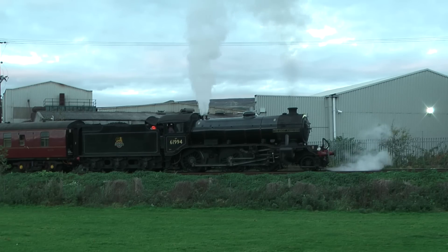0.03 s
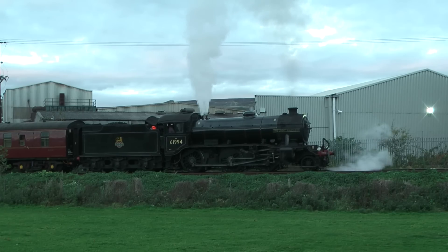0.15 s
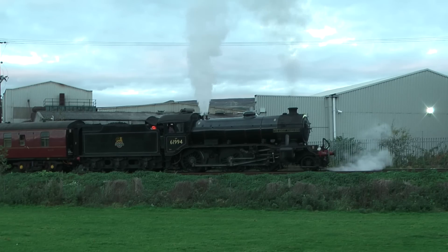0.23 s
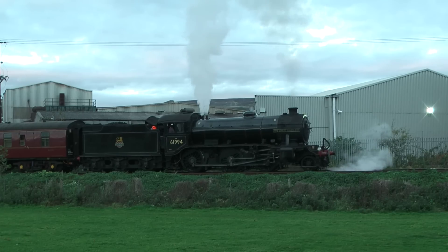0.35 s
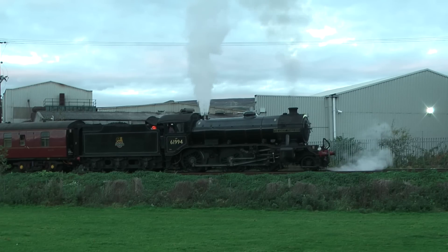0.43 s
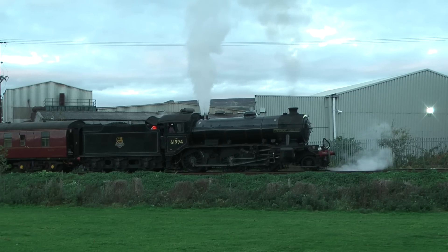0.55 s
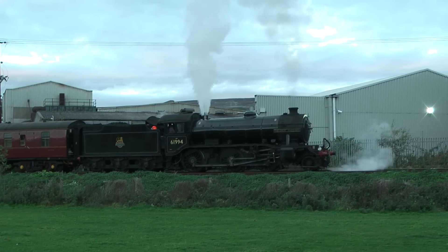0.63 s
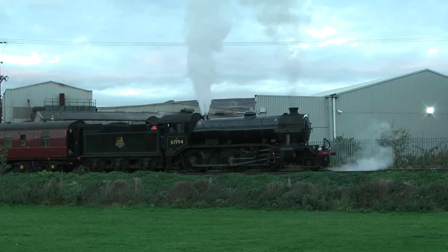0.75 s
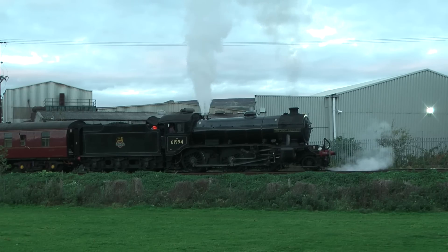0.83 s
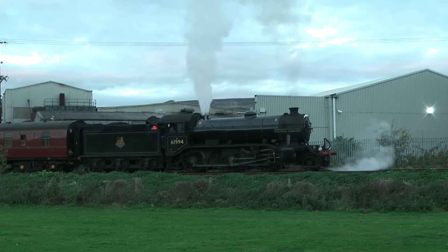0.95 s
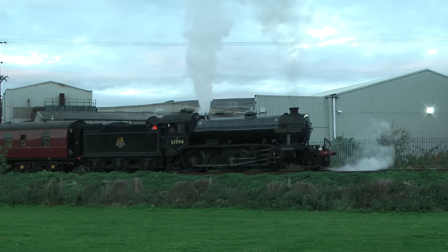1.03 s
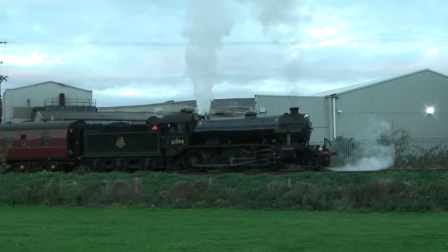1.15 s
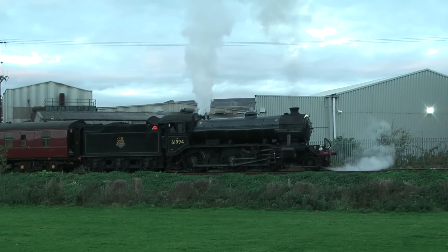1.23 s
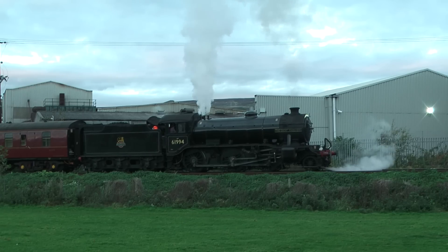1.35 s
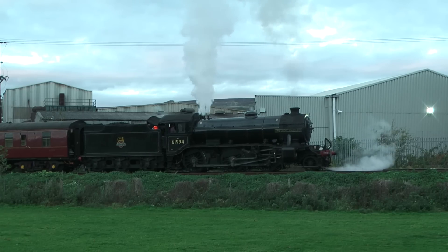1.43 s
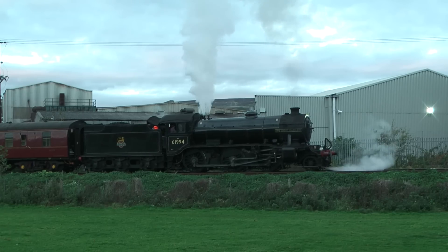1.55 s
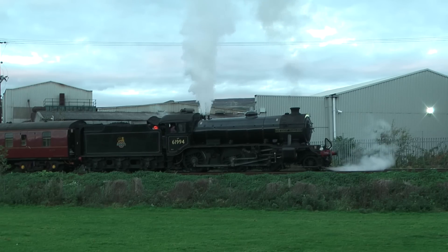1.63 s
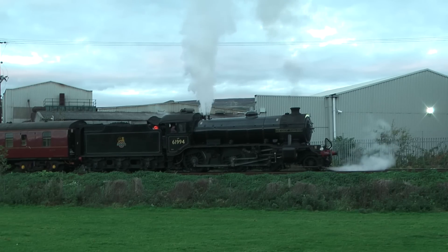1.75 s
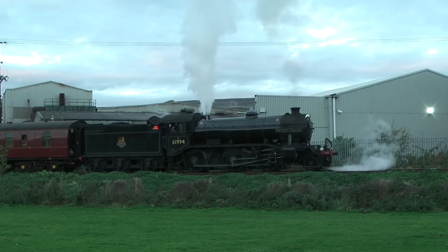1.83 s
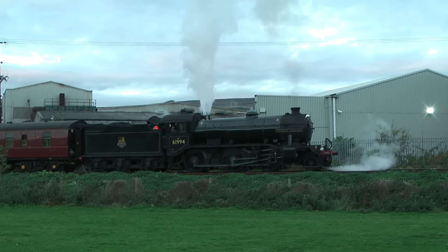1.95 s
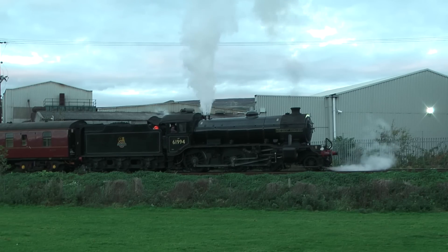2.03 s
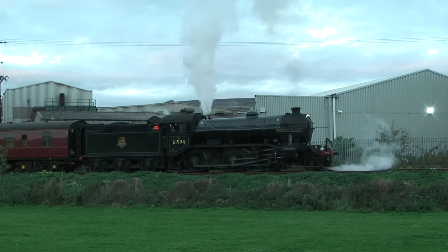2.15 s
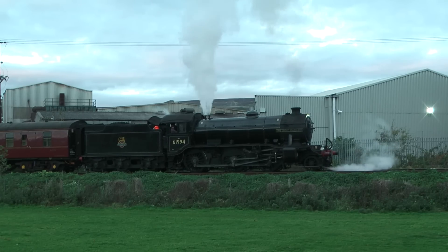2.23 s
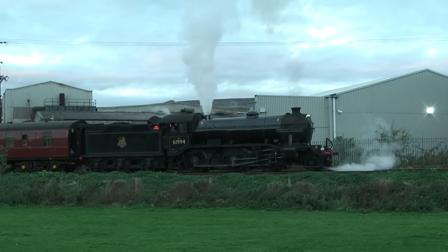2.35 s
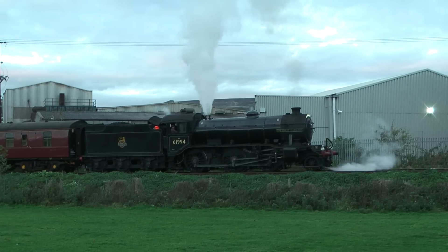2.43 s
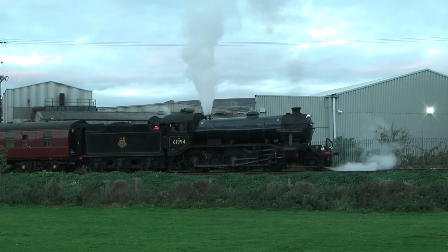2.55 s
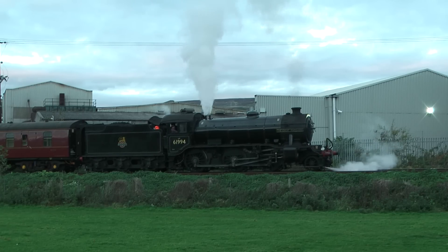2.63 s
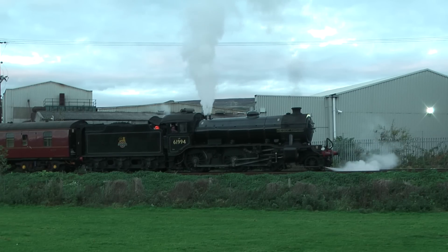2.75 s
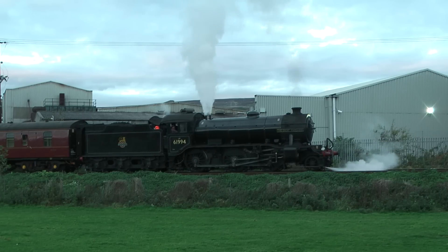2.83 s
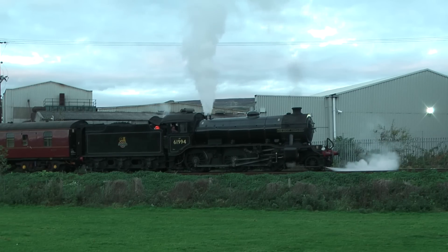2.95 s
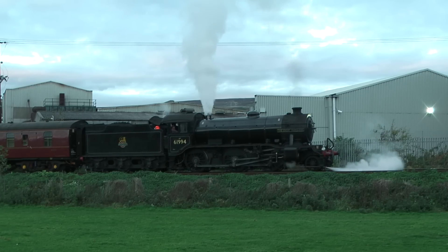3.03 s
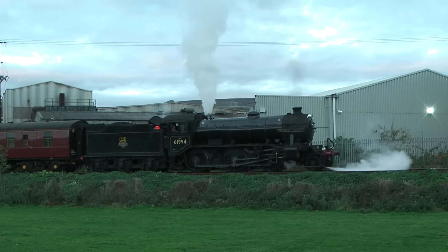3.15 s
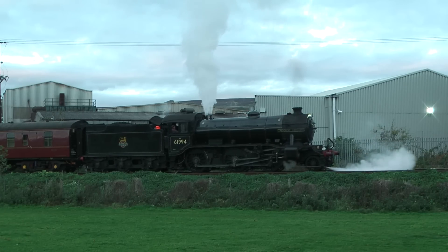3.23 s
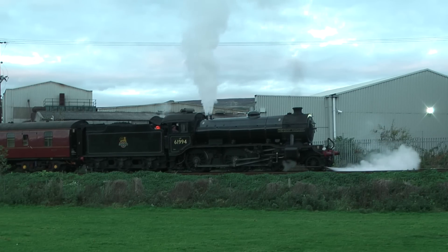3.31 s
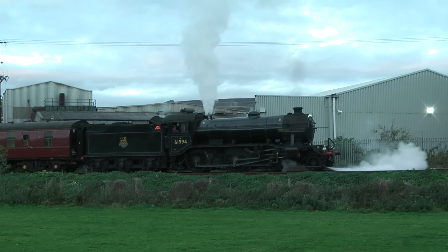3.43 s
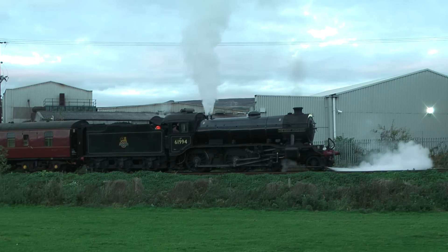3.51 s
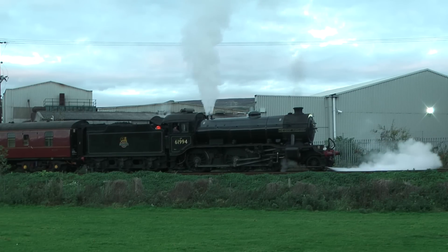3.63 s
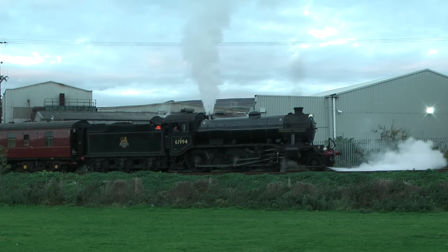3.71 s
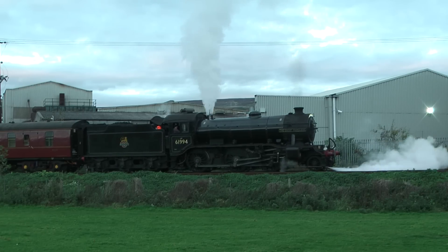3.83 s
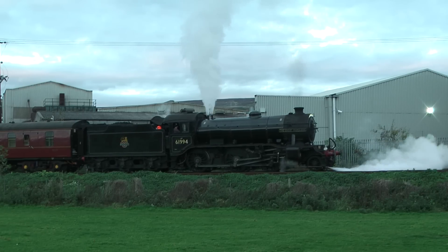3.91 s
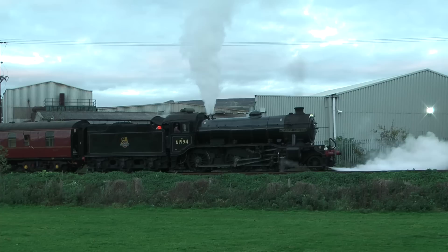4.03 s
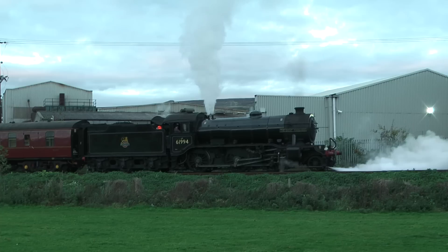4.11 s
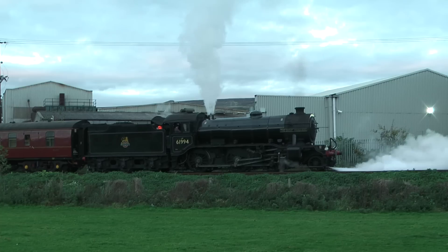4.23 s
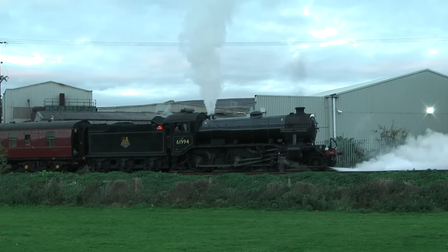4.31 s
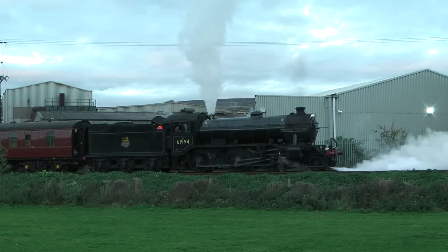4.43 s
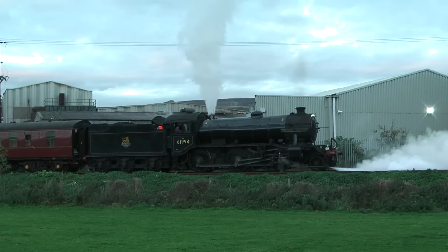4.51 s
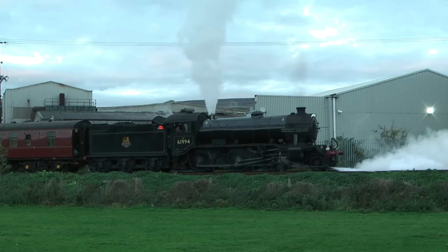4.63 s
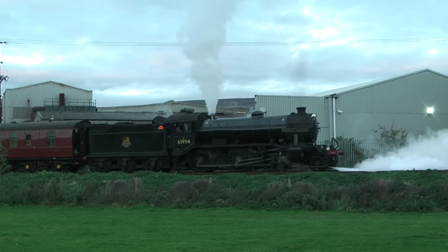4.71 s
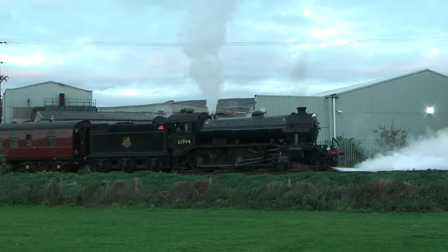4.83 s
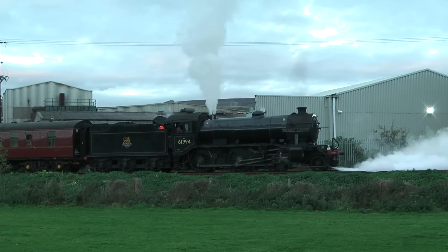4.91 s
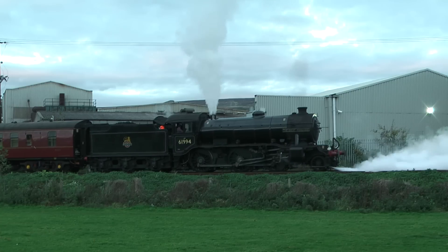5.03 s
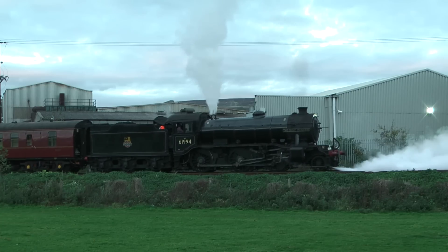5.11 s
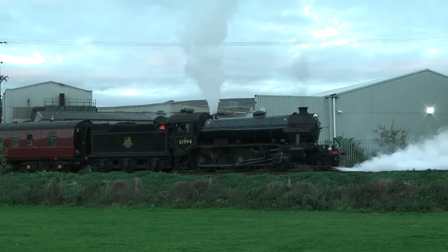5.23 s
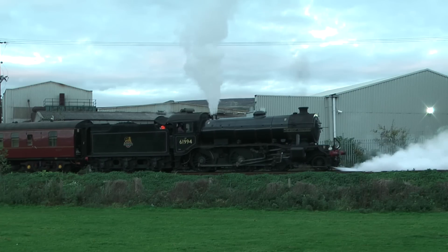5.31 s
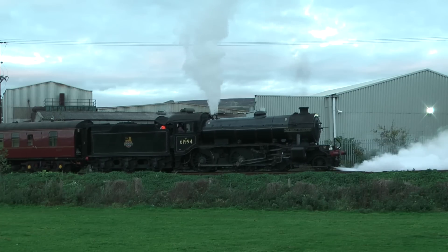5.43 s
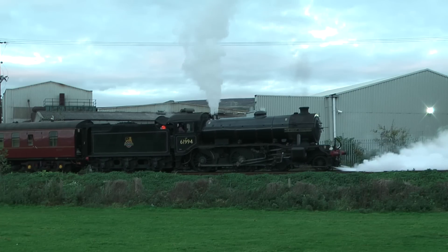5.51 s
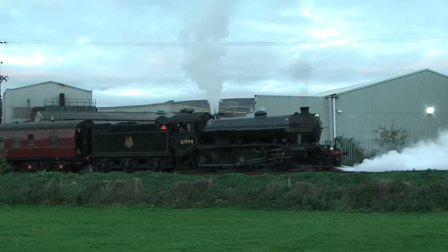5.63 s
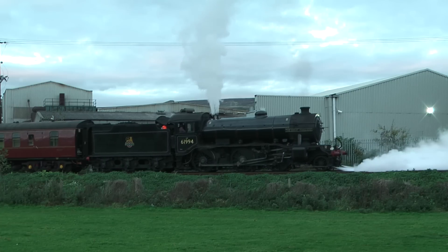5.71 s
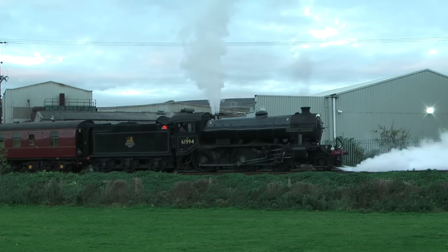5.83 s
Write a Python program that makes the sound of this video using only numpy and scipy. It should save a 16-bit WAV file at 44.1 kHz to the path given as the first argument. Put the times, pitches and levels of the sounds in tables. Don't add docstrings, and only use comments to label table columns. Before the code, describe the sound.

Outdoors beside a railway, heard from across grass on a stereo microphone: constant airy safety-valve hiss with a dull chimney draught and distant rumble. One abrupt, breathy whistle pip sounds early, followed by bright metallic slap echoes trailing away. Then the drain cocks open and wet steam gushes, quickly covering the earlier hiss and growing steadily fuller and brighter to the end.

```python
import sys
import numpy as np
from scipy import signal
from scipy.fft import rfft, irfft, next_fast_len
from scipy.io import wavfile
from scipy.ndimage import uniform_filter1d, map_coordinates

SR = 44100
rng = np.random.default_rng(int(sys.argv[2]) if len(sys.argv) > 2 else 0)


def voltage_ratio(decibels):
    exponent = np.asarray(decibels, float) / 20
    return 10 ** exponent


def inscribe(sig):
    pcm = np.round(np.clip(np.atleast_2d(sig).T, -1, 1) * 32767)
    wavfile.write(sys.argv[1], SR, pcm.astype(np.int16))


N = 258867

# (frequency [Hz], level [dB])
VALVE_SIDE = [(60, -10), (99, -16), (160, -4), (270, -8), (450, -19), (740, -14), (1220, -13.5),
              (2010, -10), (3330, -8), (5500, 4.5), (9080, 10.5), (15000, 11)]
# (frequency [Hz], level [dB])
COCK_SIDE = [(60, -3.5), (92, -35), (140, -25), (210, -39), (330, -12), (500, -15), (770, -17), (1170, -12),
             (1790, -12.5), (2740, -9), (4190, -5), (6410, 7), (9810, 5.5), (15000, 18)]


def whistle():
    # (time [s], frequency [Hz])
    pitch_curve = [
        (1.246, 1008),
        (1.262, 1056),
        (1.273, 1104),
        (1.284, 1134),
        (1.3, 1149),
        (1.326, 1138),
        (1.34, 1095),
        (1.355, 940),
        (1.375, 770),
    ]
    # (multiple of the pitch [-], level [dB])
    overtones = [(1, 0), (2, -17), (3, -10), (4, -15), (5, -29), (6, -42), (7, -46)]
    # (frequency [Hz], level [dB per Hz])
    breath_colour = [(100, -22), (400, -16.5), (1000, 2.5), (1800, -9), (3000, -3), (6000, -17),
                     (9000, -29.5), (15500, -44)]
    pitch_hz, = curves(pitch_curve)
    failing = np.clip((1060 - pitch_hz) / 150, 0, 1) * (clock() > 1.3)
    shake = (.002 + .06 * failing) * wobble(220)
    phase = 2 * np.pi * np.cumsum(pitch_hz * (1 + shake)) / SR
    tone = 0
    for multiple, db in overtones:
        partial_db = db + .5 * (multiple - .6) * wobble(120) - 12 * (multiple - 1) * failing
        tone = tone + voltage_ratio(partial_db) * np.sin(multiple * phase)
    snap_db = np.clip(8 - 300 * (clock() - 1.26), 0, 8)
    rush = jet(lambda hz: voltage_ratio(along(breath_colour, hz)), patchy_db=3)
    breath = split(rush, 7500, -25 + snap_db + 14 * failing, -23)
    steam = toot_level()
    return steam * (tone + breath[0]), steam * breath[1]


def toot_level():
    pull_s, attack_s, hold_s, release_s, gasp_s = 1.2415, .0105, .088, .006, .022
    toot_db, toot_sag_db, gasp_db, gasp_sag_db, shut_db = -7.3, 2.3, -19, 10, -56
    steps_s = [0, attack_s / 2, attack_s / 2, hold_s, release_s, gasp_s, release_s]
    times = pull_s + np.cumsum(steps_s)
    levels = [shut_db, gasp_db, toot_db, toot_db - toot_sag_db, gasp_db, gasp_db - gasp_sag_db, shut_db]
    is_open = (clock() > times[0]) * (clock() < times[-1])
    return voltage_ratio(np.interp(clock(), times, levels)) * is_open


def cocks():
    # (time [s], level [dB])
    flow = [
        (2.6, -62),
        (2.71, -77),
        (2.76, -48.5),
        (2.83, -42),
        (2.97, -35.5),
        (3.1, -33.5),
        (3.83, -29),
        (4.27, -25.5),
        (5.0, -23.5),
        (5.87, -22.5),
    ]
    # (frequency [Hz], level [dB per Hz])
    hiss_colour = [(880, -22.5), (1500, -5.5), (1810, -12.5), (2470, 3.5), (2890, 1.5), (4840, 0.5),
                   (6120, -7), (6620, -15), (7810, -11.5), (8700, -19), (9590, -17.5), (10600, -26.5),
                   (12100, -23.5), (14000, -33.5), (15500, -35.5)]
    # (frequency [Hz], level [dB per Hz])
    body_colour = [(180, -60), (300, -20), (422, -24.5), (714, -8.5), (782, -9.5), (1800, -5.5),
                   (2200, -2.5), (2860, -30), (4840, -120)]
    # (frequency [Hz], level [dB per Hz])
    roar_colour = [(24, -52.5), (40, -35), (71, -2.5), (145, 8), (237, -1), (312, -15), (380, -42),
                   (490, -48), (840, -120)]
    full_flow_db = -23
    hiss_db, = curves([(0, -100), (2.5, -100)] + flow)
    below_full_db = hiss_db - full_flow_db
    roar_db = -44 + 1.05 * below_full_db
    body_db = -30.5 + below_full_db
    fizz_db = -22.5 + .72 * below_full_db
    drying_s, drying_db_per_s = 3.67, 3
    fizz_db = fizz_db + drying_db_per_s * np.clip(clock() - drying_s, 0, None)
    surge = .2 * wobble(14) + .35 * wobble(60)

    def hiss_response(hz):
        pipe_mode = 1 + .5 / (1 + ((hz - 4760) / 110) ** 2)
        return voltage_ratio(along(hiss_colour, hz)) * pipe_mode

    hiss = jet(hiss_response, patchy_db=.6, lo_hz=2000, hi_hz=6000)
    spit = voltage_ratio(0.17 * wobble(900))
    body = jet(lambda hz: voltage_ratio(along(body_colour, hz)), patchy_db=-0.6)
    roar = jet(lambda hz: voltage_ratio(along(roar_colour, hz)), patchy_db=.2)
    pair = split(hiss * spit, 6930, hiss_db + surge, fizz_db + surge)
    top_lift_db = np.clip(-0.74 * -below_full_db, 0, 6)
    pair = split(pair, 10500, 0, top_lift_db)
    return ports(pair + voltage_ratio(body_db + surge) * body + voltage_ratio(roar_db) * roar, COCK_SIDE)


def valves():
    # (frequency [Hz], level [dB per Hz])
    valve_colour = [(90, -42), (300, -9), (520, -0.5), (800, -7), (2000, -8.5), (2700, -0.5), (3410, -2),
                    (5300, -12), (5600, -12), (5800, -14), (6400, -23.5), (9150, -26.5), (10300, -34),
                    (14700, -32), (15500, -45)]
    start_db, sag_db_per_s, treble_db, screech_db = -44.5, 0.63, 1, -75
    spurt_s, spurt_length_s, spurt_db = 0.12, .15, 1.5
    hiss_db = start_db - sag_db_per_s * clock()
    spurt = np.exp(-((clock() - spurt_s) / spurt_length_s) ** 2)
    top_db = start_db + treble_db + spurt_db * spurt

    def response(hz):
        bounce = 0.72 / (1 + (hz / 6000) ** 4)
        ground = 1 + bounce * np.exp(-2j * np.pi * hz * 0.001497)
        return voltage_ratio(along(valve_colour, hz)) * ground

    pair = jet(response, patchy_db=0.8, lo_hz=1810, hi_hz=6000)
    flutter = .6 * wobble(8) + .6 * wobble(25)
    screech = jet(lambda hz: 1 / (1 + ((hz - 14150) / 22) ** 2), patchy_db=-2.0)
    hiss = split(pair, 5300, hiss_db + flutter, top_db + flutter)
    return ports(hiss + voltage_ratio(screech_db) * screech, VALVE_SIDE)


def blower():
    # (frequency [Hz], level [dB per Hz])
    blower_colour = [(100, -27), (200, -3.5), (300, -12), (450, 0.5), (880, -12.5), (1130, 7.5),
                     (1650, -4.5), (2300, 0.5), (3000, -13), (6000, -54.5)]
    start_db, ease_s, ease_length_s, ease_db = -60.5, 0.27, 0.12, 4
    pair = jet(lambda hz: voltage_ratio(along(blower_colour, hz)), patchy_db=-0.5, lo_hz=850, hi_hz=1050)
    eased = np.clip((clock() - ease_s) / ease_length_s, 0, 1)
    return ports(voltage_ratio(start_db - ease_db * eased) * pair, VALVE_SIDE)


def sheds(x):
    # (frequency [Hz], time [s])
    scatter = [(200, 1.6), (900, 2.6), (1150, 2.9), (2300, 3.8), (4500, 1.2), (9000, 0.94)]
    # (frequency [Hz], level [dB])
    clutter = [(1000, -9), (2000, 4.5), (4000, -5.5), (5500, 5.5), (7000, 5.5), (10000, 8.5), (14000, -28)]

    def walls(hz):
        sides = np.array([[.5], [-.5]])
        total = 0
        for delay_s, db, pan_db, octave_db, upper_db in echo_rows():
            colour_db = np.interp(hz, [1500, 2300, 3400, 4600], [0, octave_db, upper_db, upper_db - 5])
            delay = np.exp(-2j * np.pi * hz * delay_s)
            total = total + voltage_ratio(db + sides * pan_db + colour_db) * delay
        return total

    def tail_colour(hz):
        skirt = 1.55 / (1 + ((hz - 958) / 59) ** 2)
        rib_share = .45
        return skirt + 1 - rib_share + voltage_ratio(3) * rib_share * ribs(hz)

    hz, t, z = signal.stft(rng.standard_normal((2, 2 * SR)), SR, nperseg=256)
    swell = voltage_ratio(-10) * np.clip(t / .2, 0, 1) ** 1.5
    late = swell * voltage_ratio(-60 * t / along(scatter, hz)[:, None])
    near = voltage_ratio(-3 + along(clutter, hz)[:, None]) * np.exp(-((t - .165) / .065) ** 4)
    tail = signal.istft(z * (late + near), SR, nperseg=256)[1] / np.sqrt(SR / 5)
    tail = signal.fftconvolve(filtered(x, tail_colour)[None], tail, axes=1)[:, :N]
    echoes = filtered(x, lambda hz: ribs(hz) * walls(hz))
    centre = echoes.mean(axis=0)
    middle = ports(np.array([centre, 0 * x]), VALVE_SIDE)
    return middle + (echoes - centre) + ports(tail, COCK_SIDE)


def echo_rows():
    # (delay [s], level [dB], left minus right [dB], octave level [dB])
    big_walls = [
        (.1621, -5.5, -8, -2),
        (.2403, -3, -2, 4),
        (.2617, -12, -5, 6),
    ]
    # (delay [s], level [dB], left minus right [dB], upper partials [dB])
    small_objects = [
        (0.064, -22.5, 0, 19),
        (.105, -18.5, -5, 11.5),
        (.135, -43, -2, 10),
        (0.201, -26, -11.5, 4.5),
    ]
    # (delay [s], level [dB], left minus right [dB])
    far_walls = [(.335, -15.5, -9.5), (.3785, -16, 4), (.51, -32.5, 15), (.62, -29.5, -8),
                 (.72, -37.5, -15), (.83, -35, -9), (.96, -30, -6), (1.14, -43, -7), (1.27, -40, 0),
                 (1.41, -38, -13), (1.53, -41, 4)]
    big = [(*row, -17) for row in big_walls]
    small = [(s, db, pan_db, 9, upper_db) for s, db, pan_db, upper_db in small_objects]
    far = [(s, db, pan_db, 7.5 - 11 * s, -4.5) for s, db, pan_db in far_walls]
    return big + small + far


def ribs(hz):
    rib_grating = 1143, .016, .16
    tone_hz, width, between = rib_grating
    nearest = np.maximum(np.round(hz / tone_hz), 1) * tone_hz
    return between + (1 - between) / (1 + ((hz / nearest - 1) / width) ** 4)


def yard():
    # (frequency [Hz], level [dB per Hz])
    yard_colour = [(12, -38), (20, -5.5), (75, 8.5), (177, -11), (204, -42), (243, -8.5), (280, -43),
                   (330, -10.5), (430, -41.5), (730, -120)]
    rumble = jet(lambda hz: voltage_ratio(along(yard_colour, hz)), patchy_db=-0.4)
    return ports(voltage_ratio(-55.5) * rumble, VALVE_SIDE)


def jet(response, patchy_db, lo_hz=0, hi_hz=SR / 2):
    z = signal.stft(rng.standard_normal((2, N)), nperseg=512)[2]
    patches = uniform_filter1d(rng.standard_normal(z.shape[1:]), size=6, axis=0)
    patches = uniform_filter1d(patches, size=8, axis=1)
    noise = signal.istft(z * voltage_ratio(patchy_db * unit(patches)), nperseg=512)[1][:, :N]
    pair = filtered(noise, response)
    return pair / np.std(filtered(pair[0], lambda hz: (hz > lo_hz) & (hz < hi_hz)))


def ports(pair, side):
    # (frequency [Hz], share [0-1])
    linked = [(60, .3), (1000, 1), (4000, 0.92), (5500, 0.5), (7500, 1), (9800, 0.8), (12000, .85)]
    # (frequency [Hz], angle [rad])
    lean = [(300, .1), (1500, -0.055), (5000, -0.23), (6500, -0.41), (8100, 1), (9000, 1), (9800, 0.8),
            (11000, 0.97), (14000, .2)]

    def difference(hz):
        tie = np.clip(along(linked, hz), 0, 1)
        lead = 1j * np.exp(-1j * along(lean, hz)) * tie
        return voltage_ratio(along(side, hz)) * np.array([lead, np.sqrt(1 - tie ** 2)])

    half = filtered(pair, difference).sum(axis=0)
    return np.array([pair[0] + half, pair[0] - half])


def split(pair, hz, low_db, high_db):
    low = filtered(pair, lambda f: 1 / (1 + (f / hz) ** 8))
    return voltage_ratio(low_db) * low + voltage_ratio(high_db) * (pair - low)


def dips(rows):
    def response(hz):
        notches = [1 - np.clip(depth, 0, 1) / (1 + ((hz - centre) / width) ** 2)
                   for centre, width, depth in rows]
        return np.prod(notches, axis=0)
    return response


def filtered(x, response):
    m = next_fast_len(N + SR)
    return irfft(rfft(x, m) * response(np.fft.rfftfreq(m, 1 / SR)), m)[..., :N]


def unit(x):
    return x / np.sqrt(np.mean(x ** 2) + 1e-20)


def along(points, hz):
    f, v = np.transpose(points)
    return np.interp(np.log(hz + 1), np.log(f + 1), v)


def curves(rows):
    s, *cols = np.transpose(rows)
    return [np.interp(clock(), s, c) for c in cols]


def wobble(rate):
    knots = rng.standard_normal(int(N * rate / SR) + 4)
    return map_coordinates(knots, [np.arange(N) * rate / SR])


def clock():
    return np.arange(N) / SR


def scene():
    # (frequency [Hz], width [Hz], depth [0-1])
    direct_dips = [(900, 80, .85), (2170, 60, .65), (3030, 70, .8), (3450, 85, .93), (4340, 70, .75),
                   (5250, 200, .7)]
    toot, twin = whistle()
    direct = ports(np.array([filtered(toot, dips(direct_dips)), twin]), VALVE_SIDE) * voltage_ratio([[0.9], [-1.3]])
    boiler = (valves() + blower()) * voltage_ratio([[.7], [-.7]])
    drains = cocks() * voltage_ratio([[-.2], [.2]])
    return direct + sheds(toot) + boiler + drains + yard()


def band_limit(x):
    return signal.sosfilt(signal.butter(12, 15630, fs=SR, output="sos"), x)


def record(dry):
    return band_limit(dry)


dry = scene()
out = record(dry)
inscribe(out)
```